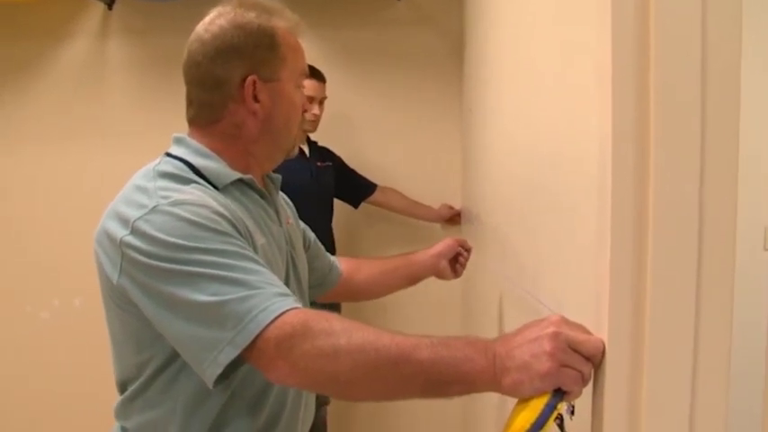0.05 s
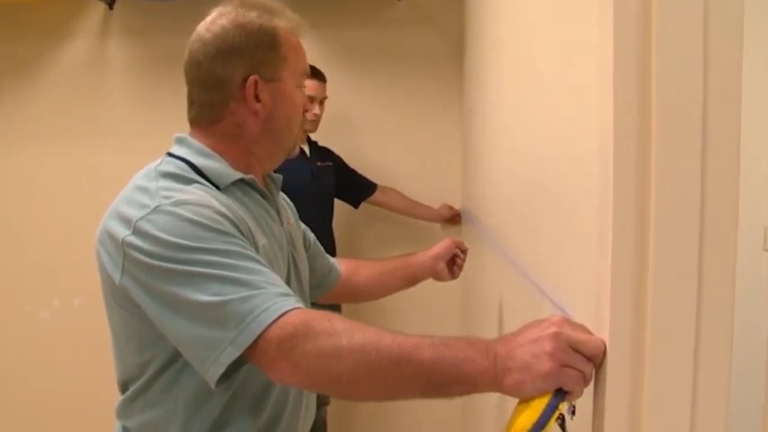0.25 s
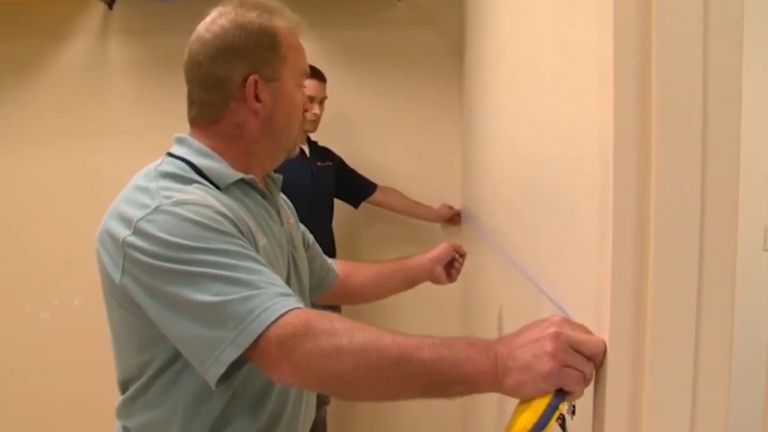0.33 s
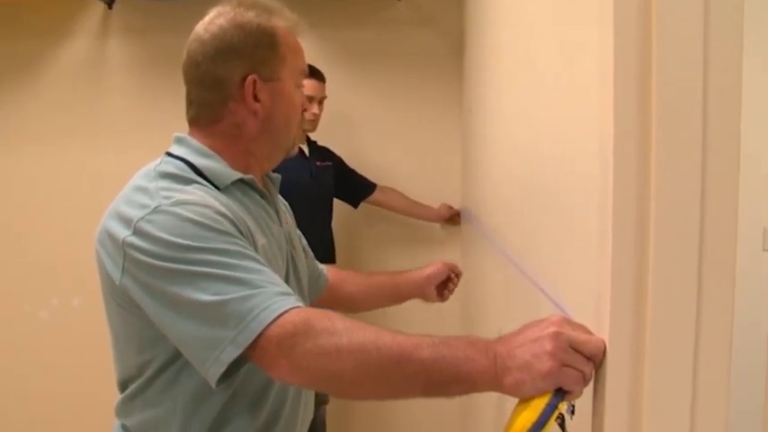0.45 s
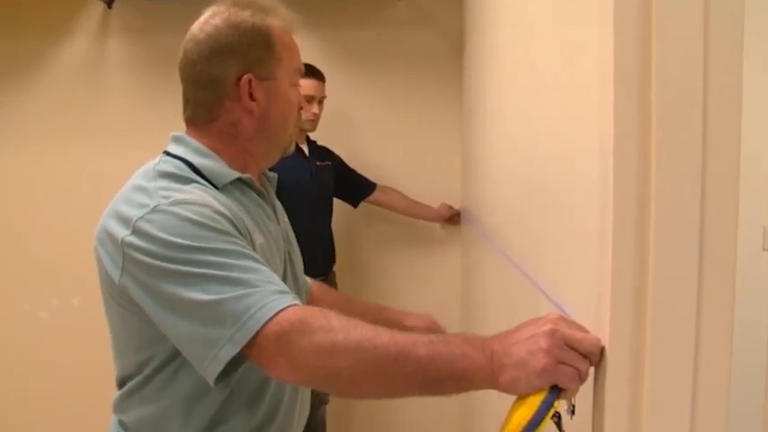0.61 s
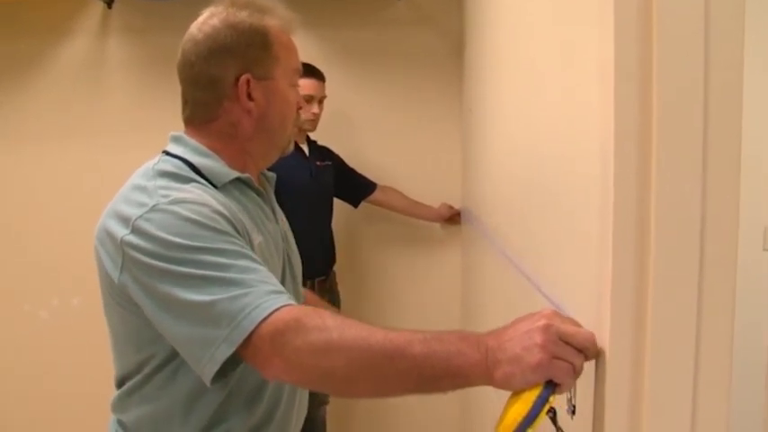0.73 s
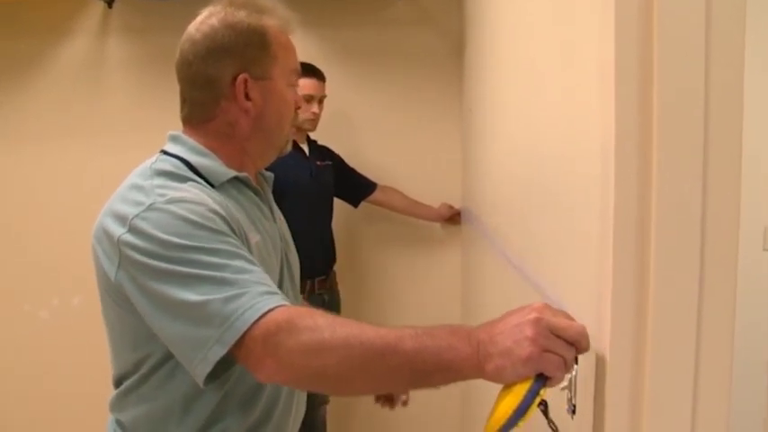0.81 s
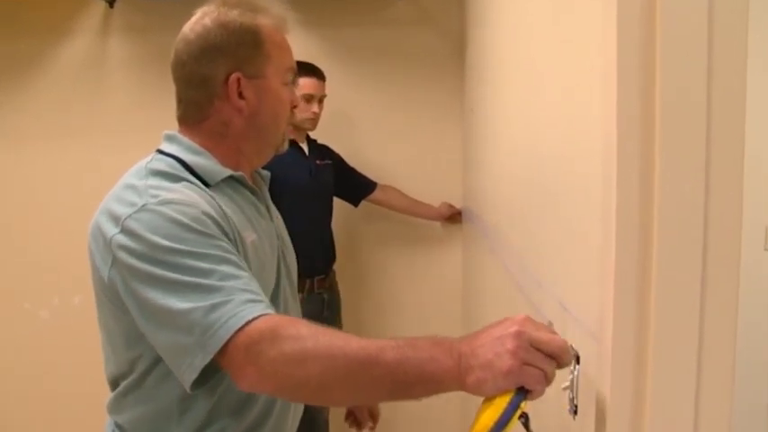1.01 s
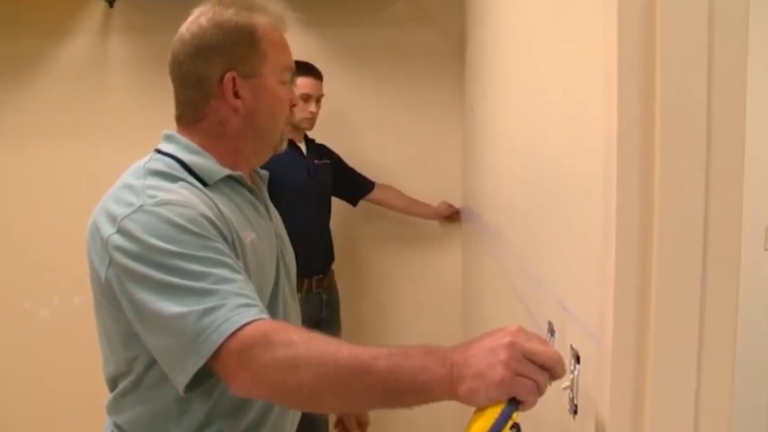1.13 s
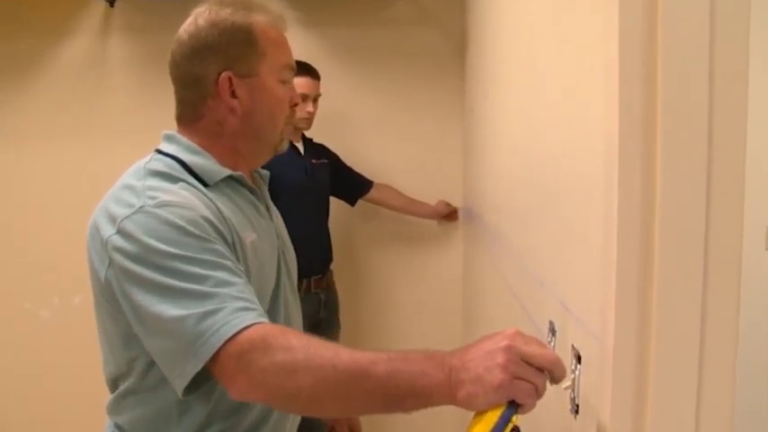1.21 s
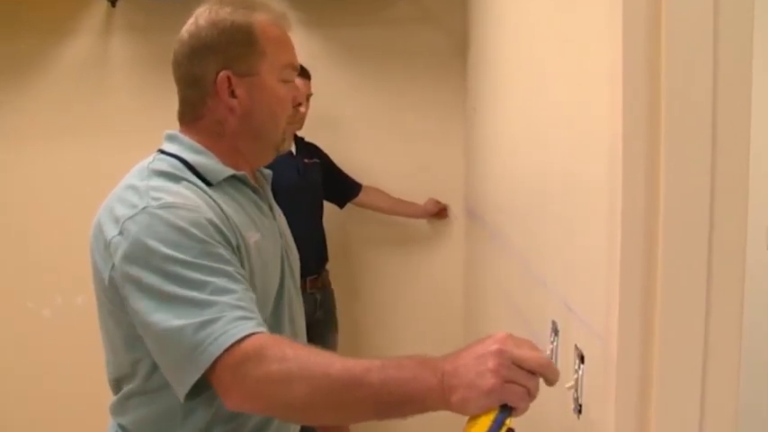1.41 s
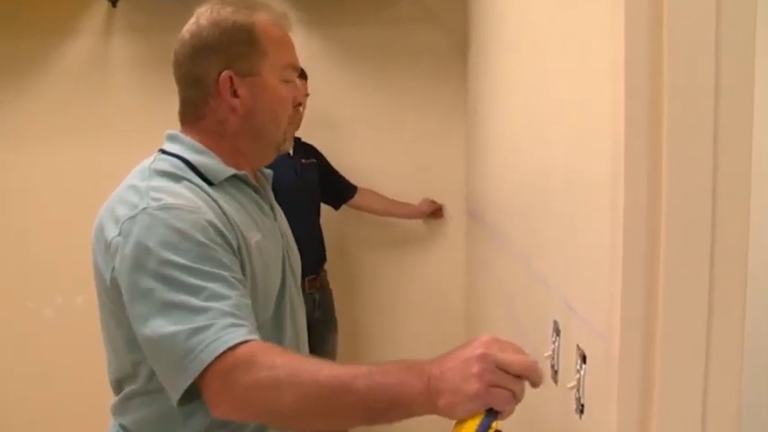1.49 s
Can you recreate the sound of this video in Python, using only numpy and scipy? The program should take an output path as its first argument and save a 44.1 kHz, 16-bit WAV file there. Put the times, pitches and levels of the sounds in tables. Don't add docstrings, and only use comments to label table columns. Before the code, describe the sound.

A taut chalk line snaps once against a hollow plaster wall, a bright clattering crack with a short thud, then room echo, tiny ticks and a faint flop over steady low hum, heard fairly close indoors.

```python
import sys
import numpy as np
from scipy import signal
from scipy.fft import rfft, irfft, next_fast_len
from scipy.io import wavfile
from scipy.ndimage import map_coordinates

SR = 44100
rng = np.random.default_rng(int(sys.argv[2]) if len(sys.argv) > 2 else 0)


def log_audio(samples):
    frames = np.atleast_2d(samples).T
    limited = np.clip(frames, -1, 1)
    pcm = np.round(limited * 32767).astype(np.int16)
    wavfile.write(sys.argv[1], SR, pcm)


def rack_gain(trim_db):
    fader = np.asarray(trim_db, float)
    return 10 ** (fader / 20)


N = 68355


def unit(x):
    return x / np.sqrt(np.mean(x ** 2) + 1e-20)


def along(points, hz):
    f, v = np.transpose(points)
    return np.interp(np.log(hz + 1), np.log(f + 1), v)


def filtered(x, response):
    m = next_fast_len(N + SR // 2)
    return irfft(rfft(x, m) * response(np.fft.rfftfreq(m, 1 / SR)), m)[..., :N]


def noise(spectrum):
    return unit(filtered(rng.standard_normal(N), lambda hz: rack_gain(along(spectrum, hz))))


def narrow_noise(center_hz, half_width_hz, order):
    response = lambda hz: 1 / (1 + ((hz - center_hz) / half_width_hz) ** order)
    return unit(filtered(rng.standard_normal(N), response))


def wobble(rate_hz):
    knots = rng.standard_normal(int(N * rate_hz / SR) + 4)
    return map_coordinates(knots, [np.arange(N) * rate_hz / SR])


def since(start_s):
    return np.maximum(np.arange(N) / SR - start_s, 0)


def ring(start_s, db, hz, t60_s, rise_s=.0001, sag=0):
    t = since(start_s)
    envelope = rack_gain(db - 60 * t / t60_s) * (1 - np.exp(-t / rise_s))
    return envelope * np.sin(2 * np.pi * hz * t * (1 - sag * np.minimum(t / t60_s, 1)))


HUM_HZ, HUM_DB, HUM_DRIFT_DB = 120.45, -54, 1.4
HAZE_DB, HAZE_HALF_WIDTH_HZ = -65, 14


def hum():
    phase = 2 * np.pi * (HUM_HZ * np.arange(N) / SR + rng.random())
    line = np.sqrt(2) * rack_gain(HUM_DB + HUM_DRIFT_DB * wobble(5.5)) * np.sin(phase)
    return line + rack_gain(HAZE_DB) * narrow_noise(HUM_HZ, HAZE_HALF_WIDTH_HZ, 4)


AIR_DB, AIR_TOP_HZ, ABOVE_TOP_DB = -59, 12100, -14
# f/Hz, density/dB
AIR_SPECTRUM = [(20, -7), (62, 1), (95, -8), (170, -20.5), (450, -25.5), (800, -35), (4000, -48.5),
                (11500, -58)]


def air():
    hiss = filtered(noise(AIR_SPECTRUM), lambda hz: np.where(hz < AIR_TOP_HZ, 1, rack_gain(ABOVE_TOP_DB)))
    return rack_gain(AIR_DB + 1.2 * wobble(4)) * hiss


SWISH_S, SWISH_DB, SWISH_GROWS_DB = 0.22, -53, 14
LANDING_S = .2309


def swish():
    u = since(SWISH_S) / (LANDING_S - SWISH_S)
    level = rack_gain(SWISH_DB + SWISH_GROWS_DB * (u - 0.5)) * np.minimum(4 * u, 1) * (u < 1)
    return level * noise([(300, -14.5), (1000, -0.5), (5000, -7.5), (16000, -10)])


PATTER_RISE_S, PATTER_HOLD_S, PATTER_T60_S, PATTER_DB = .006, .018, 0.083, -32.5
# f/Hz, density/dB
PATTER_SPECTRUM = [(300, -30.5), (900, -11), (1900, -10.5), (2900, -4.5), (4800, -7.5), (8000, -14.5),
                   (14500, -14.5), (16500, -30)]


def patter():
    t = since(LANDING_S)
    rise = np.minimum(t / PATTER_RISE_S + 0.51 * (t > 0), 1)
    fall = rack_gain(-60 * np.maximum(t - PATTER_RISE_S - PATTER_HOLD_S, 0) / PATTER_T60_S)
    return rack_gain(PATTER_DB + 3 * wobble(700)) * rise * fall * noise(PATTER_SPECTRUM)


KNOCK_T60_CYCLES, KNOCK_SAG = 16, .15
# t/s, knock level/dB, knock f/Hz, crack level/dB
CONTACTS_ON_WALL = [
    (.2310, -35.5, 1100, -31),
    (0.2341, -32.5, 4600, -12.5),
    (.2360, -29, 3900, -37),
    (.2379, -28, 3506, -21),
    (0.2408, -21, 2826, -40),
    (0.243, -21, 3150, -39),
    (0.2482, -23, 2750, -36),
    (0.2511, -22, 4196, -24.5),
    (.2590, -31, 2995, -39),
    (0.2715, -29, 4300, -36.5),
]
# f/Hz, level/dB, t60/s
CRACK_MODES = [(11500, 0.5, 0.0015), (14700, -1, 0.0027)]


def contacts():
    out = np.zeros(N)
    for t_s, knock_db, knock_hz, crack_db in CONTACTS_ON_WALL:
        out += ring(t_s, knock_db + 9, knock_hz, KNOCK_T60_CYCLES / knock_hz, rise_s=0.00068, sag=KNOCK_SAG)
        for hz, db, t60_s in CRACK_MODES:
            out += ring(t_s, crack_db + 4.5 + db, hz, t60_s, rise_s=0.00026)
    return out


BOARD_S, BOARD_RISE_S = .239, 0.017
THUD_DB, THUD_RISE_S, THUD_T60_S = -28.5, .012, 0.1
# f/Hz, level/dB, t60/s
BOARD_MODES = [(112.4, -39, 0.12), (172, -48.5, .09), (254, -45, .07), (440.3, -45, .07), (570.5, -42, .09),
               (910, -48, .07)]
# f/Hz, density/dB
THUD_SPECTRUM = [(60, -25.5), (140, -0.5), (310, -7.5), (540, 1), (800, -5), (1100, -5.5), (2200, -15.5),
                 (4000, -40)]


def board():
    modes = sum(ring(BOARD_S, db + 10.5, hz, t60_s, rise_s=BOARD_RISE_S) for hz, db, t60_s in BOARD_MODES)
    t = since(BOARD_S)
    thud = rack_gain(THUD_DB - 60 * t / THUD_T60_S) * (1 - np.exp(-(t / THUD_RISE_S) ** 2))
    return modes + thud * noise(THUD_SPECTRUM)


ROOM_S, ROOM_FILL_S, NEAR_DB, FAR_DB = .24, .012, -34, -49.5
# f/Hz, density/dB
ROOM_SPECTRUM = [(70, -19), (150, -1), (300, -4.5), (600, -3), (1700, -9.5), (3000, -3), (5000, -7),
                 (16000, -19.5)]
# f/Hz, t60/s
NEAR_DECAY = [(150, 0.57), (500, 0.49), (1500, 0.39), (3000, .34), (7000, 0.33), (12000, .29), (16000, .19)]
# f/Hz, t60/s
FAR_DECAY = [(150, .9), (1000, .8), (4000, .7), (9000, 0.44), (16000, .2)]


def room(decays):
    hz, t, z = signal.stft(noise(ROOM_SPECTRUM), SR, nperseg=256)
    decay = rack_gain(-60 * np.maximum(t - ROOM_S, 0) / along(decays, hz)[:, None])
    tail = signal.istft(z * decay, SR, nperseg=256)[1][:N]
    return tail * (1 - np.exp(-(since(ROOM_S) / ROOM_FILL_S) ** 2))


def rooms():
    return rack_gain(NEAR_DB) * room(NEAR_DECAY) + rack_gain(FAR_DB) * room(FAR_DECAY)


# t/s, level/dB, f/Hz
LATE_TOUCHES = [
    (.4218, -60, 11000),
    (.4712, -47, 8140),
    (.7555, -66, 1400),
]


def ticks():
    out = np.zeros(N)
    for t_s, db, hz in LATE_TOUCHES:
        out += ring(t_s, db, hz, 12 / hz)
        out += ring(t_s, db - 12, hz * .45, 8 / hz)
        out += ring(t_s, db - 15, hz * 1.1, 12 / hz)
    return out


BUMP_S, BUMP_DB, BUMP_RISE_S, BUMP_T60_S = 0.53, -60.5, .006, 0.17
# f/Hz, density/dB
BUMP_SPECTRUM = [(200, -20), (500, 1), (1200, -6), (3200, -10), (6000, -15), (12000, -36)]


def bump():
    t = since(BUMP_S)
    return rack_gain(BUMP_DB - 60 * t / BUMP_T60_S) * (1 - np.exp(-t / BUMP_RISE_S)) * noise(BUMP_SPECTRUM)


# t/s, dull level/dB, bright level/dB
RUSTLE_LEVELS = [(.6, -90, -100), (.72, -79, -92), (.76, -74.5, -87.5), (.85, -81.5, -97),
                 (.94, -74.5, -93), (1.02, -79.5, -92), (1.1, -76.5, -89), (1.16, -81, -93),
                 (1.175, -79.5, -79.5), (1.33, -80.5, -86), (1.42, -83, -100), (1.49, -80.5, -90),
                 (1.521, -75.5, -81), (1.55, -70, -80)]
# f/Hz, density/dB
DULL_SPECTRUM = [(200, -19.5), (450, 6.5), (1000, -4.5), (1330, -3.5), (1700, -11), (2100, -7),
                 (4000, -30.5), (9000, -60)]
# f/Hz, density/dB
BRIGHT_SPECTRUM = [(1200, -25.5), (2100, -1), (3500, 0), (4800, -8.5), (9000, -22), (12000, -30.5),
                   (16000, -39.5)]


def rustle():
    t_s, dull_db, bright_db = np.transpose(RUSTLE_LEVELS)
    t = np.arange(N) / SR
    dull = rack_gain(np.interp(t, t_s, dull_db) + 2 * wobble(23)) * noise(DULL_SPECTRUM)
    bright = rack_gain(np.interp(t, t_s, bright_db) + .8 * wobble(60)) * noise(BRIGHT_SPECTRUM)
    return dull + bright


LIFT_S, LIFT_RISE_S, LIFT_HZ, LIFT_HALF_WIDTH_HZ = 1.495, .035, 2910, 110
LIFT_DB, LIFT_HISS_DB = -77, -76.5
# f/Hz, density/dB
LIFT_SPECTRUM = [(600, 0), (2900, -8.5), (5000, -2.5), (10000, -14), (16000, -19)]


def lift():
    rub = since(LIFT_S) / LIFT_RISE_S
    band = narrow_noise(LIFT_HZ, LIFT_HALF_WIDTH_HZ, 2)
    tone = rack_gain(LIFT_DB + 1.5 * wobble(110)) * np.minimum(rub, 1) * band
    return tone + rack_gain(LIFT_HISS_DB) * rub * noise(LIFT_SPECTRUM)


def scene():
    slap = swish() + patter() + contacts() + board() + rooms()
    after = ticks() + bump() + rustle() + lift()
    return (hum() + air() + slap + after)[None]


def band_limit(x):
    return signal.sosfilt(signal.butter(12, 17000, fs=SR, output="sos"), x)


EDGE_HZ, EDGE_DB, TOP_HZ = 15900, -24, 16900


def record(dry):
    corners_hz = [EDGE_HZ - 200, EDGE_HZ + 300, TOP_HZ, TOP_HZ + 300]
    mix = filtered(dry, lambda hz: rack_gain(np.interp(hz, corners_hz, [0, EDGE_DB, EDGE_DB, -90])))
    return band_limit(mix)


dry = scene()
out = record(dry)
log_audio(out)
```